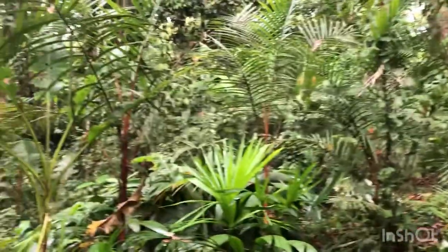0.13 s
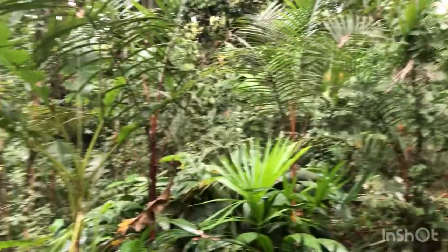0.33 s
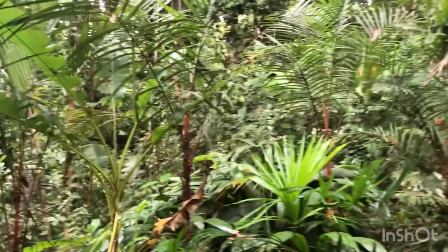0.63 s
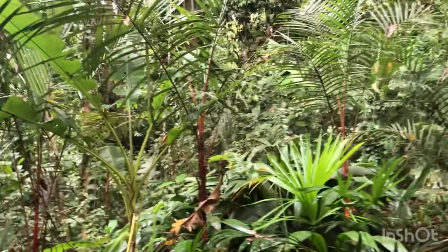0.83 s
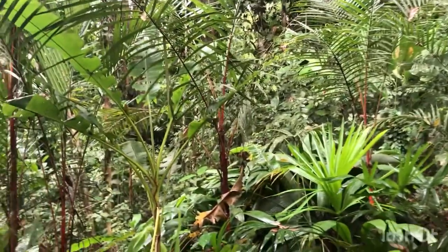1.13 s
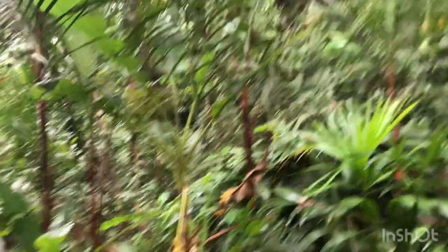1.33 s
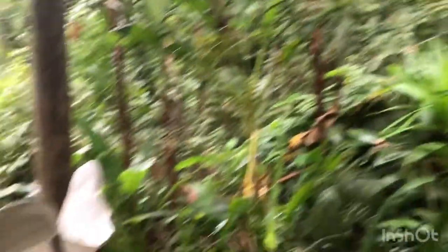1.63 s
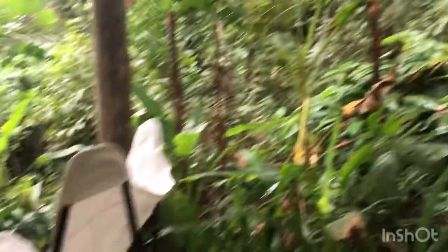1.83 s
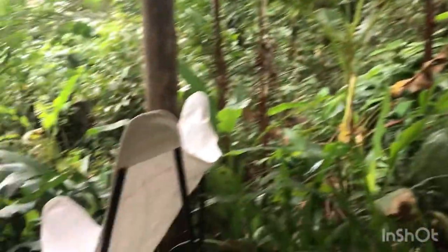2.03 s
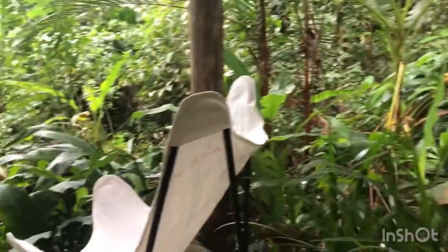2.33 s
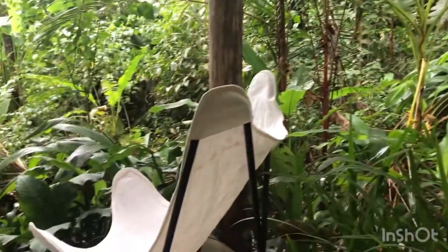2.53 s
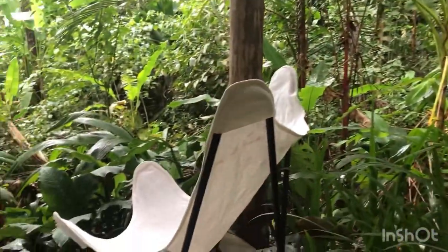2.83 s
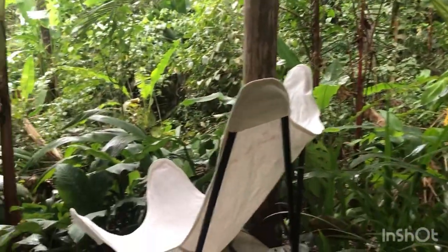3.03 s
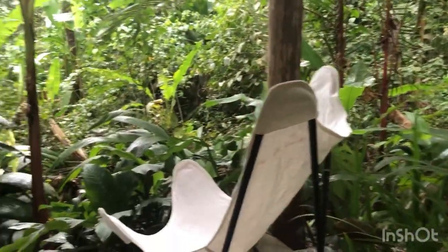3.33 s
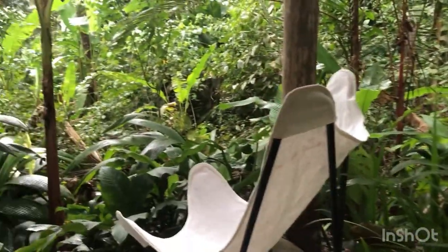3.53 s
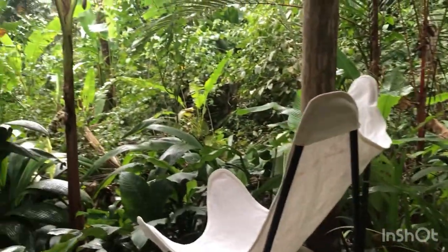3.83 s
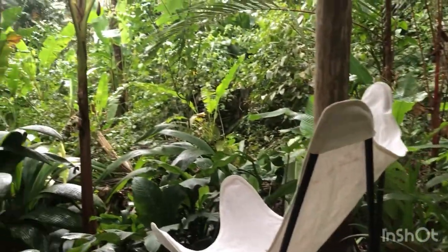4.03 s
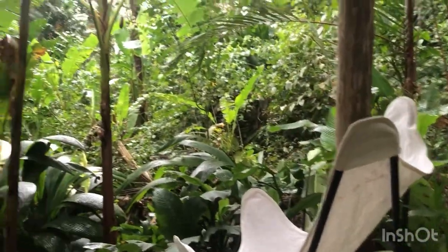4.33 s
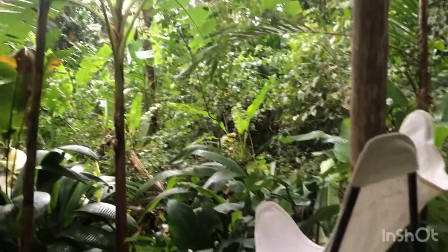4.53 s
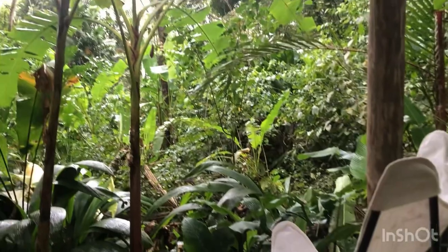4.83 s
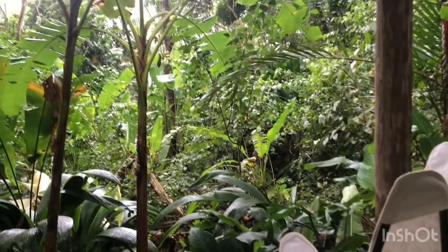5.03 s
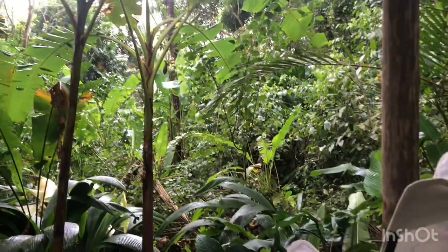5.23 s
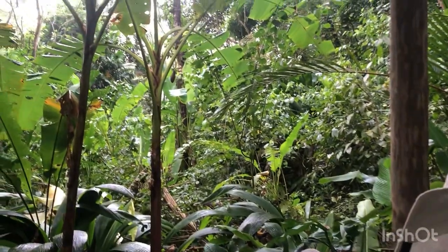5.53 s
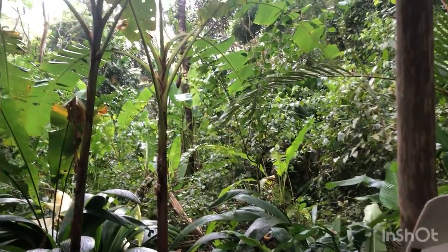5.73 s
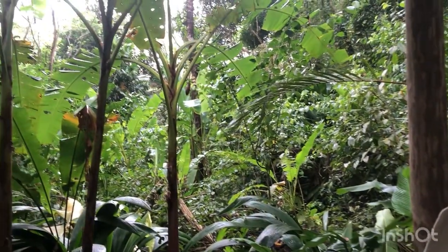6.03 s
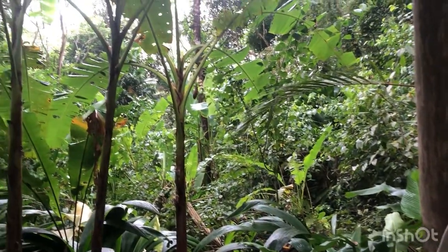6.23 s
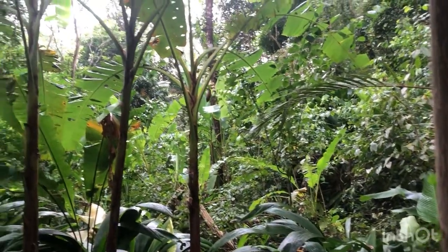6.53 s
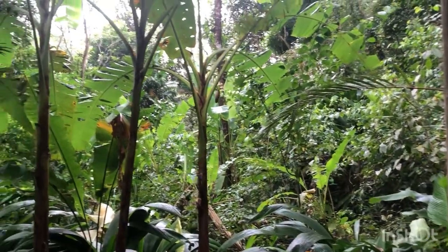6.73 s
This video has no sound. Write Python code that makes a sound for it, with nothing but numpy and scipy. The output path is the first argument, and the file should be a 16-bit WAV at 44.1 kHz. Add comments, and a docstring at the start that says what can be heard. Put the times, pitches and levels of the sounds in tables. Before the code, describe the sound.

A continuous wet-forest scene lasting about 7 seconds. From the start, several small tree frogs peep near 6 kHz: tiny whistles of about three hundredths of a second, gliding upward, slightly fluttering and blurred by short forest echoes. The steadiest near one calls about every 0.3 seconds until 5.0; another strong, slightly lower voice appears once at 2.8, then repeats from 5.2, with a quick cluster at 6.6-6.8. Far behind, countless peeps merge into a high shimmer, with a faint throbbing cricket trill. Soft rain and fine patter continue throughout, easing near 2.8, strengthening around 3.8, easing near 5.3 and growing again towards the end. Irregular close drops tap leaves, some low and papery, others bright and snappy, clustering at 0.4-0.5 and 3.5-4.0, with a prominent tap at 4.6. At 2.3, one short, dull hollow thump lands close to the small microphone. It ends mid-ambience.

```python
"""Small tree frogs peep in a wet forest: sinusoids gliding upward near 6 kHz, blurred by sparse random echoes.
Single drops tap nearby leaves, modelled as noise bursts exciting broad resonances, with cracks and splashes.
One dull thump of decaying partials lands close to the microphone. Behind lie a far chorus of echoed peeps,
light rain as drifting coloured noise with a patter of small drops, and a thin cricket trill of throbbing
narrow-band noise."""
import sys
import numpy as np
from scipy import signal
from scipy.fft import rfft, irfft, next_fast_len
from scipy.io import wavfile
from scipy.ndimage import uniform_filter1d

SR = 44100
rng = np.random.default_rng(int(sys.argv[2]) if len(sys.argv) > 2 else 0)


def to_wav(s):
    """Save 16-bit WAV."""
    ch = np.atleast_2d(s).T  # columns
    pcm = np.round(np.clip(ch, -1, 1) * 32767)  # PCM
    wavfile.write(sys.argv[1], SR, pcm.astype(np.int16))


def boost_factor(decibels):
    """Convert a level in decibels to a linear amplitude factor."""
    exponent = np.asarray(decibels, float) / 20
    return 10 ** exponent


N = 303849  # length of the scene [samples]

# near frogs, each with its own voice: (starting pitch [Hz], level before echo gain [dB],
# depth of the mid-peep fade [0-1], moments of its peeps [s])
FROG_VOICES = [(6043, -43.5, 0, [0.118, 0.345, 0.572, 0.823, 1.068, 1.379, 1.705, 1.98, 2.286, 2.664, 3.026, 3.333, 3.687, 3.97, 4.199, 4.456, 4.715, 4.988]),
               (5797, -40, .75, [2.78, 5.214, 5.429, 5.686, 5.945, 6.185, 6.6, 6.694, 6.791]),
               (5720, -47.5, 0.15, [0.201, 0.532, 0.702, 0.866, 1.26, 1.44, 1.971, 2.385, 3.799, 4.119, 5.587, 6.069]),
               (5607, -46.5, 0, [1.575, 1.814, 2.152, 2.54, 2.92, 3.589, 4.409, 4.456, 4.643, 4.827, 5.024, 5.327, 6, 6.097, 6.396, 6.425, 6.573]),
               (5585, -47, 0, [0.019, 0.336, 0.995, 1.29, 2.127, 2.404, 2.679, 3.157, 3.196, 3.366, 4.012, 4.19, 4.258, 5.547, 5.803, 5.911, 6.326, 6.858]),
               (5660, -51, 0, [0.286, 0.505, 1.664, 1.746, 2.342, 3.575, 3.819, 4.79, 5.111, 5.34, 5.461]),
               (5200, -55, .1, [1.951, 3.84, 4.686, 4.906, 6.75])]
# level of the near frogs as the microphone turns: (time [s], level [dB])
FACING_LEVEL = [(0, -0.5), (1.5, -.5), (3, -.5), (4.5, .5), (5.7, 0), (6.9, -1.2)]
# loudest drops on near leaves: (time [s], tap peak [dB], leaf pitch [Hz], crack level [dB], splash level [dB])
LOUD_DROPS = [(0.404, -35.5, 350, -52, -64), (0.434, -39, 1280, -59, -65), (0.446, -34.5, 2270, -51, -63),
              (0.451, -33.5, 2300, -50, -68), (0.52, -48, 538, -52, -64), (0.631, -44.5, 350, -56, -53.5),
              (1.045, -49, 315, -58, -57), (1.348, -58, 1900, -51.5, -48.5), (1.608, -38.5, 960, -65, -76),
              (1.677, -42.5, 400, -50.5, -68), (1.844, -41, 1260, -67, -74), (1.883, -39, 930, -50, -75),
              (2.08, -59, 813, -49, -59), (2.149, -53, 463, -47.5, -57), (2.271, -34, 288, -45.5, -56),
              (2.291, -38, 255, -47.5, -61), (2.424, -47, 960, -49.5, -55), (2.929, -42, 450, -70, -73),
              (2.959, -50, 497, -51.5, -58), (3.311, -47, 1860, -50, -63), (3.512, -41, 760, -44.5, -75),
              (3.655, -37.5, 1250, -66, -76), (3.68, -42, 500, -52, -53.5), (3.699, -34.5, 607, -44.5, -61),
              (3.853, -40.5, 1010, -50, -69), (3.947, -41, 340, -59, -70), (3.999, -37.5, 2150, -56, -58),
              (4.19, -53, 1520, -51, -55.5), (4.607, -31, 1400, -62, -75), (4.654, -40, 1350, -56, -56.5),
              (4.799, -52, 331, -49.5, -61), (4.84, -43.5, 440, -52, -57), (5.14, -54, 1690, -53, -57),
              (5.184, -41.5, 675, -55, -72), (5.647, -48, 1670, -52, -60), (5.786, -48, 1010, -60, -56),
              (5.951, -44, 260, -71, -64), (6.126, -41.5, 333, -57, -71), (6.164, -37, 1140, -53, -61),
              (6.175, -37, 1050, -49.5, -63), (6.389, -43, 540, -64, -59), (6.481, -39, 1500, -60, -68),
              (6.54, -46, 1490, -58, -53), (6.763, -38, 1400, -53, -64), (6.827, -42.5, 250, -54.5, -56)]
# spectrum of a dry crack: (frequency [Hz], level [dB])
CRACK_SPECTRUM = [(700, 1.5), (1800, 2), (3200, -0.5), (4500, -0.5), (7000, -23.5)]
# spectrum of a hissing splash: (frequency [Hz], level [dB])
SPLASH_SPECTRUM = [(3000, 4.5), (5500, 6), (9000, 4), (12000, 1.5), (16000, -2.5)]
# partials of the dull knock: (frequency [Hz], level [dB], decay by 60 dB [s])
THUMP_PARTIALS = [(142, -21, 0.057), (278, -24, 0.053), (487, -34, .04)]
# spectral density of rain on the foliage: (frequency [Hz], level per Hz [dB])
RAIN_SPECTRUM = [(25, -7), (50, -1.5), (110, -3), (250, -5), (600, -3.5), (1500, -4), (3000, -8),
                 (5000, -12), (7500, -17), (10000, -19.5), (13000, -25), (16000, -26)]
# strength of the patter: (time [s], level [dB])
SHOWER_LEVEL = [(0, 0), (1.2, 0), (2.8, -3.1), (3.8, 2), (5.3, -2), (6.2, 2), (6.9, 2.4)]

PEEP_S, RISE_HZ, BEND = 0.0319, 428, 1.535  # length, glide of a low voice, how early it flattens
# slowest flutter in loudness, as close echoes beat with the peep; random addition up to the second
FLUTTER_PER_S, FLUTTER_SPREAD_PER_S = 70.7, 37.1
FADE_AT, FADE_WIDTH = 0.39, 0.17  # where close echoes make a peep fade for a moment, as shares of its length
VARY_DB, VARY_HZ = 3.06, 42  # farthest one peep strays from its frog's usual level and pitch
EARLY_T60_S, LATE_T60_S = 0.08, 0.2  # echoes of a near peep
ECHO_GAIN_DB = 4  # energy of a peep with its echoes, over the direct sound alone
FLEX = 0.5  # share of the blade's flex in a tap
DROP_WAIT_S = 0.002  # short wait before each near drop sounds
# softer near drops: rate, mean levels, largest departure from each, lowest and highest leaf
SOFT_PER_S, SOFT_TAP_DB, SOFT_CRACK_DB, SOFT_SPLASH_DB, SOFT_SPREAD_DB = 2.4, -48, -57.5, -67, 8
LOW_LEAF_HZ, HIGH_LEAF_HZ = 330, 1500
THUMP_S = 2.275
FAR_DB, FAR_HZ, FAR_SPREAD_HZ, FAR_PER_S = -52.5, 5703, 371.3745, 90  # spread: farthest from the centre
WASH_DB, PATTER_DB, PATTER_PER_S = -55.5, -59, 400
CRICKET_DB, CRICKET_HZ, CRICKET_WIDTH_HZ, TRILL_PER_S = -67.5, 6825, 280, 26


def peep(hz, fade=0.):
    """Frequency and amplitude modulation: a whistle glides up and flattens; higher voices glide further."""
    u = np.arange(round(PEEP_S * SR)) / (PEEP_S * SR)  # share of the peep elapsed
    rise_hz = RISE_HZ + 0.52 * np.clip(hz - 5550, 0, 450)
    pitch = hz + rise_hz * (1 - (1 - u) ** BEND)
    start, speed = rng.random(2)
    flutter_hz = FLUTTER_PER_S + FLUTTER_SPREAD_PER_S * speed
    flutter = 1 + 0.49 * np.sin(2 * np.pi * (start + flutter_hz * PEEP_S * u))
    shape = np.minimum(u / 0.042, 1) * np.minimum((1 - u) / 0.36, 1)
    shape *= 1 - np.clip(fade, 0, 1) * np.exp(-((u - FADE_AT) / FADE_WIDTH) ** 2)
    return shape * flutter * np.sin(2 * np.pi * np.cumsum(pitch) / SR)


def frogs():
    """Multipath propagation: each near peep adds direct sound to its own early and late echoes."""
    out = np.zeros(N)
    for hz, db, fade, moments in FROG_VOICES:
        strays = 2 * rng.random((len(moments), 2)) - 1
        for s, (high, loud) in zip(moments, strays):
            level_db = db + np.interp(s, *np.transpose(FACING_LEVEL)) + VARY_DB * loud
            whistle = peep(hz + VARY_HZ * high, fade)
            call = boost_factor(level_db) * np.pad(whistle, (0, SR // 3))  # room for the echoes
            early = boost_factor(-2.5) * scatter(call, EARLY_T60_S)
            late = boost_factor(-3.5) * scatter(call, LATE_T60_S)
            heard = call + early + late
            heard *= np.linalg.norm(call) / np.linalg.norm(heard)
            add(out, s, boost_factor(ECHO_GAIN_DB) * heard)
    return out


def tap(hz, t60):
    """Impact excitation: a sharp blow drives a leaf's broad resonance and the slower flex of its blade."""
    blow = burst(t60, 0.00068) + 4 * burst(0.0036, 0.00031)
    snap = resonate(resonate(blow, hz, 0.46 * hz), hz, 2.64 * hz)
    bend = burst(2 * t60, 0.0018)
    flex = resonate(resonate(bend, 0.57 * hz, 0.27 * hz), 0.49 * hz, 1.0 * hz)
    highpass = signal.butter(2, 0.27 * hz, "high", fs=SR, output="sos")
    sound = signal.sosfilt(highpass, snap + FLEX * flex)
    return sound / abs(sound).max()


def crack():
    """Transient noise: a very short dry burst with a faint longer tail."""
    sound = coloured(burst(0.0059, 0.0013) + boost_factor(-22) * burst(0.076, 0.0051), CRACK_SPECTRUM)
    return sound / np.std(sound[:300])


def splash():
    """Broadband spray noise: a brief hiss, then a weaker tail as the water breaks into droplets."""
    sound = coloured(burst(0.01, 0.00086) + boost_factor(-10.0) * burst(0.12, 0.0067), SPLASH_SPECTRUM)
    return sound / np.std(sound[:300])


def soft_drops():
    """Random arrivals: rows like those of the loud drops, with uniform levels and log-uniform leaf pitch."""
    when, leaf, a, b, c = rng.random((round(SOFT_PER_S * N / SR), 5)).T
    usual_db = [[SOFT_TAP_DB], [SOFT_CRACK_DB], [SOFT_SPLASH_DB]]
    tap_db, crack_db, splash_db = SOFT_SPREAD_DB * (2 * np.array([a, b, c]) - 1) + usual_db
    leaf_hz = LOW_LEAF_HZ * (HIGH_LEAF_HZ / LOW_LEAF_HZ) ** leaf
    return list(zip(when * N / SR, tap_db, leaf_hz, crack_db, splash_db))


def drops():
    """Superposition at impact: each near drop sums the tap of its leaf, a crack and a splash."""
    out = np.zeros(N)
    for s, tap_db, hz, crack_db, splash_db in LOUD_DROPS + soft_drops():
        s += DROP_WAIT_S
        add(out, s, boost_factor(tap_db) * tap(hz, 0.017 + 9 / hz))  # lower leaves ring longer
        add(out, s, boost_factor(crack_db) * crack())
        add(out, s, boost_factor(splash_db) * splash())
    return out


def thump():
    """Modal decay: a dull knock on something hollow, its partials swelling over a few milliseconds."""
    t, out = np.arange(SR // 5) / SR, np.zeros(N)
    body = sum(boost_factor(db - 60 * t / t60) * np.sin(2 * np.pi * hz * t) for hz, db, t60 in THUMP_PARTIALS)
    add(out, THUMP_S, body * (1 - np.exp(-(t / 0.0096) ** 2)))
    return out


def far_chorus():
    """Diffuse superposition: many distant frogs at random moments, smeared by long echoes."""
    out = np.zeros(N)
    for when, low, high, size in rng.random((round(FAR_PER_S * N / SR), 4)):
        voice = peep(FAR_HZ + FAR_SPREAD_HZ * (low + high - 1))
        add(out, when * N / SR, boost_factor(-8 * size) * voice)
    smeared = scatter(np.tile(out, 2), 0.82)[N:]  # second pass: echoes already ring at the start
    return boost_factor(FAR_DB) * evened(smeared)


def patter():
    """Shot noise: countless smaller drops excite leaves of all sizes, with ticks and echoes; a few are large."""
    falls = rng.exponential(1, N)
    size = boost_factor(4.36 * np.minimum(falls, 4)) * (rng.random(N) < PATTER_PER_S / SR)
    leaf, out = rng.integers(0, 70, N), np.zeros(N)
    for k, hz in enumerate(np.geomspace(230, 4500, 70)):
        tick = boost_factor(-28) * coloured(burst(0.023, 0.0012), RAIN_SPECTRUM)
        drop = tap(hz, 0.0051 + 4 / hz) * (hz / 1000) ** 0.29 + tick
        echoed = drop + boost_factor(-1.5) * scatter(drop, 0.053)
        out += signal.oaconvolve(size * (leaf == k), echoed)[:N]
    shower_db = np.interp(np.arange(N) / SR, *np.transpose(SHOWER_LEVEL))
    return boost_factor(PATTER_DB + shower_db) * evened(out)


def wash():
    """Modulated random noise: distant rain with drifting patches and a flicker shared over wide bands."""
    frames = N // 128 + 6
    a, b, raw = rng.standard_normal((frames, 257, 3)).T  # each: frequency bins by frames
    flicker = evened(uniform_filter1d(uniform_filter1d(raw, 90, 0), 5, 1))  # wide and quick
    patches = evened(uniform_filter1d(uniform_filter1d(raw[::-1], 8, 0), 30, 1))  # narrow and slow
    spectrum = (a + 1j * b) * boost_factor(0.97 * patches + 1.44 * flicker)
    noise = signal.istft(spectrum, nperseg=512, noverlap=384)[1][:N]
    return boost_factor(WASH_DB) * evened(coloured(noise, RAIN_SPECTRUM))


def cricket():
    """Amplitude modulation of narrow-band noise: a thin fuzzy tone throbs unevenly."""
    drift = 8 * uniform_filter1d(rng.standard_normal(N), 4000)
    turns = np.cumsum(TRILL_PER_S * (1 + drift)) / SR
    once = resonate(rng.standard_normal(N), CRICKET_HZ, CRICKET_WIDTH_HZ)
    tone = resonate(once, CRICKET_HZ, CRICKET_WIDTH_HZ)
    return boost_factor(CRICKET_DB) * evened(tone * (1 + 0.33 * np.sin(2 * np.pi * turns)))


def scatter(x, t60, start_s=.002):
    """Multiple scattering off leaves and trunks: sparse taps of random sign and size decay exponentially."""
    at = np.arange(round(start_s * SR), SR // 2, 30)
    taps = np.zeros(SR // 2 + 30)
    decay = boost_factor(-60 * at / SR / t60)
    taps[at + rng.integers(0, 30, len(at))] = rng.standard_normal(len(at)) * decay
    return signal.oaconvolve(x, taps / np.linalg.norm(taps))[:len(x)]


def burst(t60, rise_s):
    """Exponential decay: white noise swells briefly and dies away by 60 dB in t60 seconds."""
    t = np.arange(SR // 8) / SR
    return rng.standard_normal(len(t)) * boost_factor(-60 * t / t60) * (1 - np.exp(-(t / rise_s) ** 2))


def resonate(x, hz, width):
    """Damped resonance: one complex pole of the given bandwidth, with gain about 1 at hz."""
    r = np.exp(-np.pi * width / SR)
    return 2 * signal.lfilter([1 - r], [1, -r * np.exp(2j * np.pi * hz / SR)], x).real


def coloured(x, points):
    """Linear filtering: shapes x by a spectrum of (frequency [Hz], level [dB]) points."""
    size = next_fast_len(len(x) + 512)
    f, db = np.transpose(points)
    hz = np.fft.rfftfreq(size, 1 / SR)
    gain = boost_factor(np.interp(np.log(hz + 1), np.log(f), db))
    return irfft(rfft(x, size) * gain, size)[:len(x)]


def evened(x):
    """Power normalisation: scales to rms 1."""
    return x / np.sqrt(np.mean(x ** 2) + 1e-20)


def add(mix, s, sound):
    """Linear superposition: mixes a sound in at s seconds."""
    part = mix[round(s * SR):][:len(sound)]
    part += sound[:len(part)]


def scene():
    """Superposition of pressures: all sources meet at one microphone."""
    near = drops() + thump()
    near_echoes = boost_factor(-10.5) * scatter(near, 0.15)
    background = far_chorus() + patter() + wash() + cricket()
    return (frogs() + near + near_echoes + background)[None]


def low_pass(x):
    """Removes everything above the highest recorded frequency."""
    return signal.sosfilt(signal.butter(12, 15710, fs=SR, output="sos"), x)


def record(dry):
    """High-pass response: a small microphone drops the deep bass below about 70 Hz."""
    highpass = signal.butter(2, 70, "high", fs=SR, output="sos")
    mix = signal.sosfilt(highpass, dry)
    return low_pass(mix)


dry = scene()
out = record(dry)
to_wav(out)
```